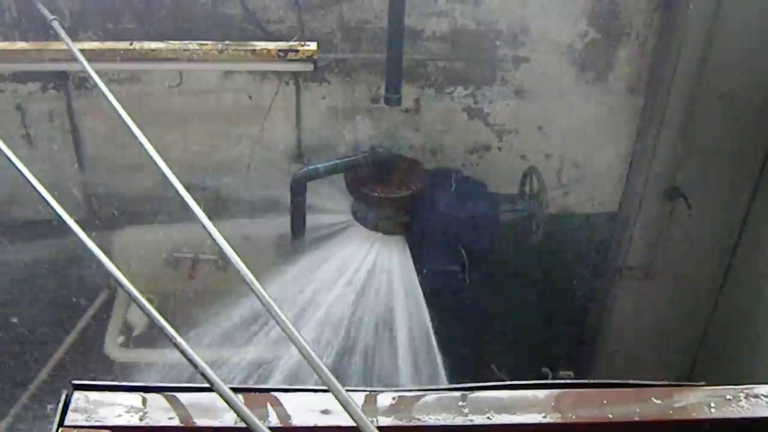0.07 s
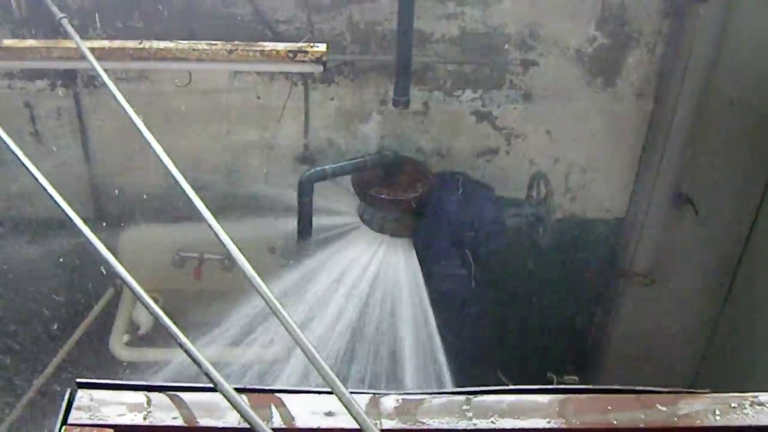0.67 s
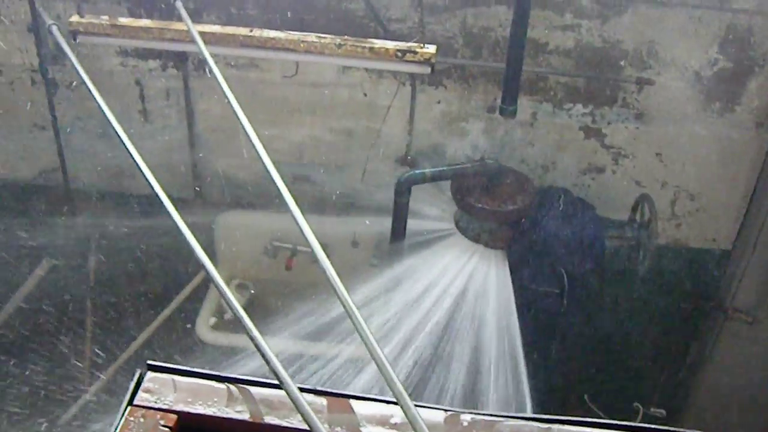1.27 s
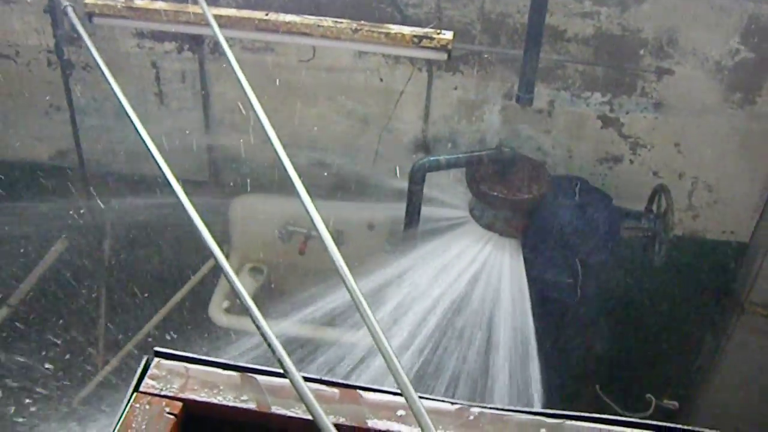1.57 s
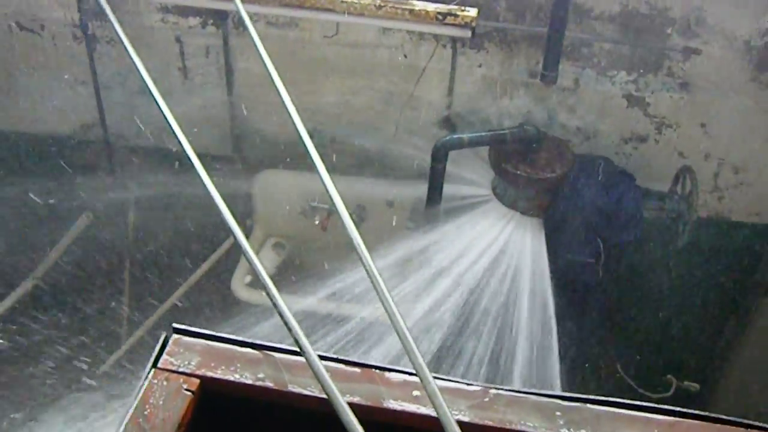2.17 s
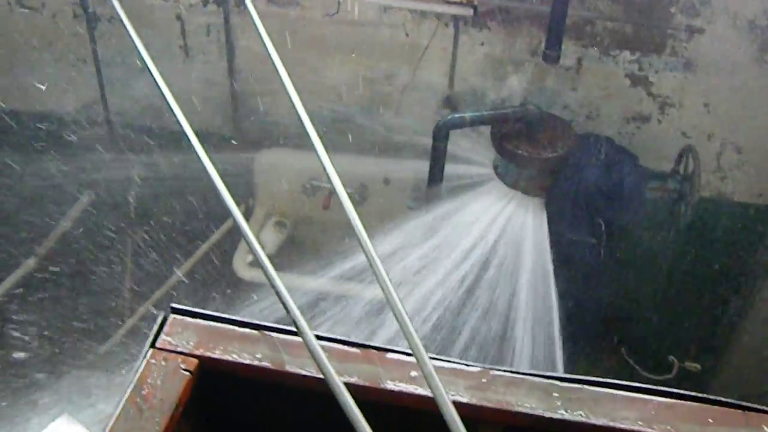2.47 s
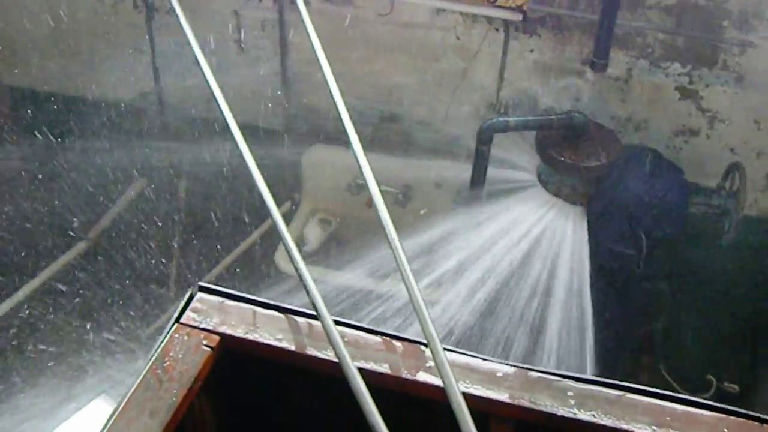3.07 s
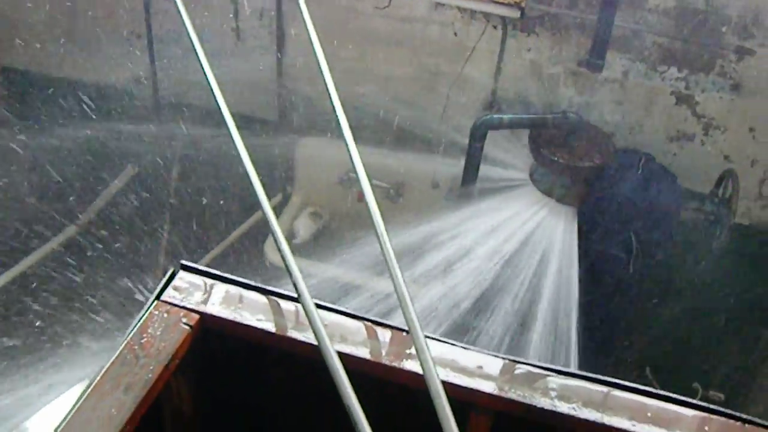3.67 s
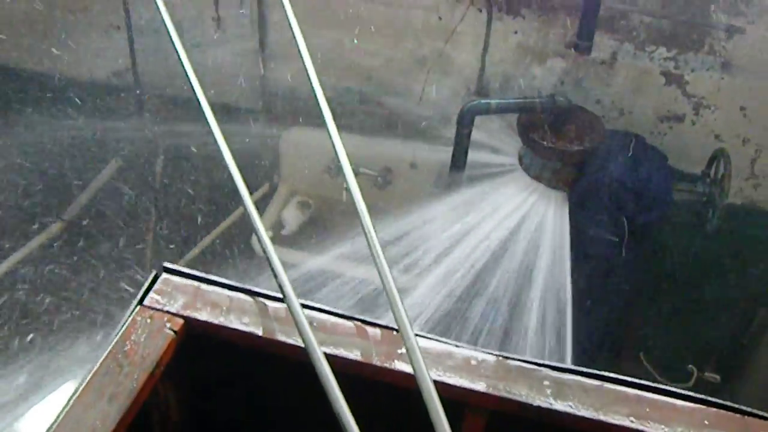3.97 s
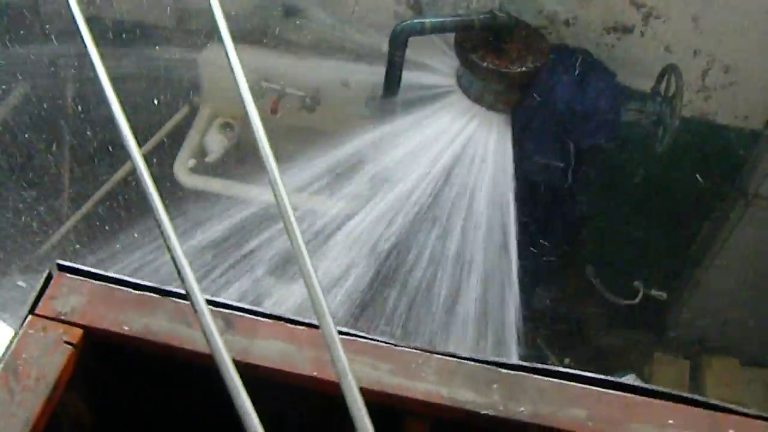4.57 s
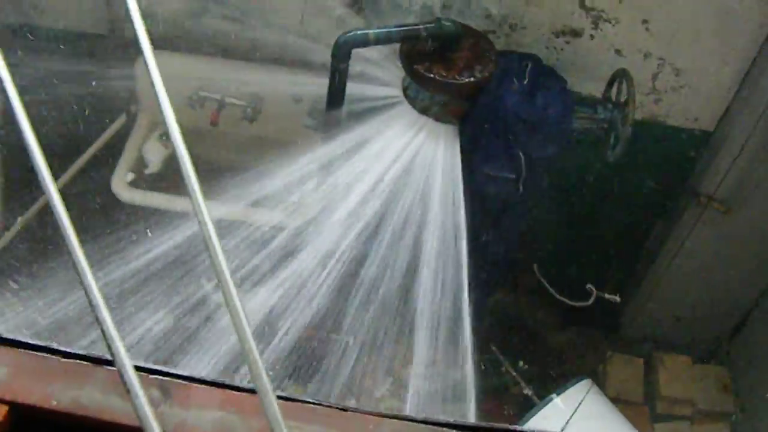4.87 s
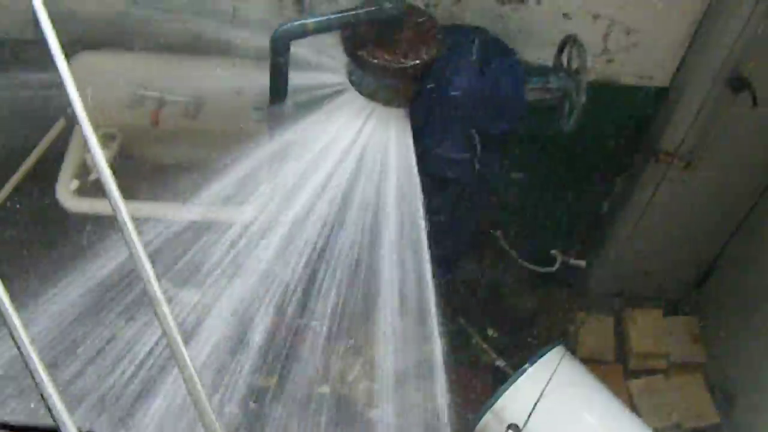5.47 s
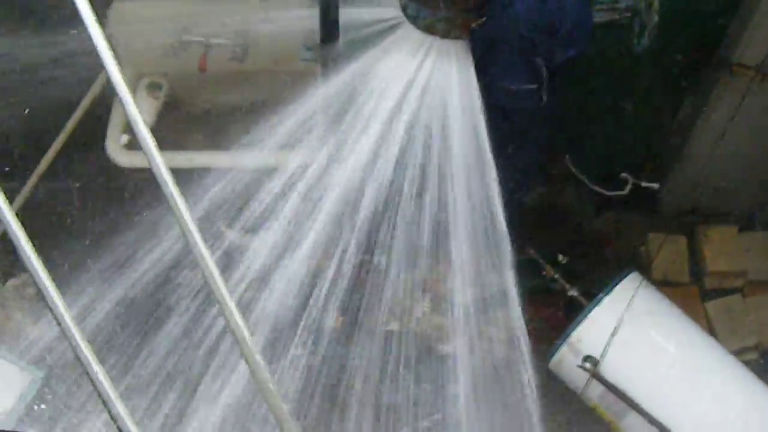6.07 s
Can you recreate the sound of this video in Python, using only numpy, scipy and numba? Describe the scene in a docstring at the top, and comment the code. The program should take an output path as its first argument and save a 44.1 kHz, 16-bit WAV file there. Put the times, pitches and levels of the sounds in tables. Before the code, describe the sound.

Pressurized water sprays from a split pipe fitting in a bare utility room, picked up by a handheld microphone a few metres away. A bright hiss cuts in abruptly just after the start and holds steady to the end. Beneath it, drops patter densely on the walls and floor, and the falling water makes a low, echoing wash. Two faint hollow splashes barely rise out of the spray in the first half.

```python
"""A bright, steady hiss cuts in as a handheld microphone is switched on, a few metres from pressurised
water fanning out of a split pipe flange in a bare utility room. The sheet hisses as it tears into drops.
The drops patter on walls and floor; the bulk of the water lands with a low wash that rings the room.
Twice a thicker gout lands with a faint hollow splash."""
import sys
import numpy as np
from scipy import signal
from scipy.fft import rfft, irfft
from scipy.io import wavfile
from numba import njit

SR = 44100
rng = np.random.default_rng(int(sys.argv[2]) if len(sys.argv) > 2 else 0)


def generate_wav(signal):
    """Clip the signal to [-1, 1] and save it as 16-bit WAV at the path in sys.argv[1]."""
    frames = np.transpose(np.atleast_2d(signal))
    scaled = np.clip(frames, -1, 1) * 32767
    pcm = np.round(scaled).astype(np.int16)
    wavfile.write(sys.argv[1], SR, pcm)


N = 278271
TIME_S = np.arange(N) / SR
FREQ_HZ = np.maximum(np.arange(N // 2 + 1) * SR / N, 1)
MIC_ON_S, TOP_HZ = 0.296, 15600


def undb(db):
    """Decibels to gain."""
    return 10 ** (np.asarray(db) / 20)


def unit(x):
    """Scale to rms 1."""
    return x / np.std(x)


def filtered(x, response):
    """Apply a frequency response."""
    return irfft(rfft(x) * response, N)


def colour(points):
    """Response through (freq_hz, gain_db) points on a log-frequency axis."""
    freq_hz, gain_db = np.transpose(points)
    return undb(np.interp(np.log(FREQ_HZ), np.log(freq_hz), gain_db))


def resonance(centre_hz, width_hz):
    """Response of one mode, gain 1 at its centre."""
    return 1 / (1 + 1j * (FREQ_HZ ** 2 - centre_hz ** 2) / (FREQ_HZ * width_hz))


def bump(at_s, sigma_s):
    """Gaussian swell from 0 to 1 and back."""
    return np.exp(-0.5 * ((TIME_S - at_s) / sigma_s) ** 2)


def walk(rate_hz):
    """Random drift, rms 1, mostly slower than rate_hz."""
    return unit(filtered(rng.standard_normal(N), 1 / (1 + (FREQ_HZ / rate_hz) ** 2)))


def impacts(rate_per_s, spread_db):
    """Random impulses: many small, a few large."""
    hit = rng.random(N) < rate_per_s / SR
    size = undb(spread_db * np.minimum(rng.exponential(size=N), 2 * np.pi))
    return unit(hit * size * rng.choice([-1, 1], N))


def churn(x, depth_db, rate_hz, band_count):
    """Overlapping bands swell and sink independently."""
    band_position = np.sqrt(np.minimum(FREQ_HZ / TOP_HZ, 1)) * (band_count - 1)
    spectrum = rfft(x)
    weights = (np.maximum(1 - abs(band_position - k), 0) for k in range(band_count))
    bands = (irfft(spectrum * weight, N) for weight in weights)
    return unit(sum(band * undb(depth_db * walk(rate_hz)) for band in bands))


def room(x, t60_s, wet_db):
    """Direct sound plus wall echo; each drop lands elsewhere, so each has its own diffuse tail."""
    energy_decay = undb(-60 * TIME_S[:SR] / t60_s) ** 2
    energy = np.maximum(signal.fftconvolve(x ** 2, energy_decay)[:N], 0)
    echo = np.sqrt(energy) * rng.standard_normal(N)
    return unit(x + undb(wet_db) * unit(echo))


def jet():
    """Turbulence at the crack and fizz of the flapping sheet bursting into mist."""
    # spectrum of the tearing sheet: freq_hz, gain_db
    hiss_spectrum = [(1200, -43), (3000, -9.5), (4500, -4), (6500, 1), (7300, 0), (8400, 1.5), (9700, 1.5),
                     (11300, -2.5), (13700, -0.7), (14700, 1.5), (15200, 0), (15700, -14.5)]
    fizz = undb(-6) * impacts(rate_per_s=5000, spread_db=2)
    turbulence = rng.standard_normal(N)
    source = churn(turbulence + fizz, depth_db=0.64, rate_hz=14, band_count=14)
    hiss = unit(filtered(source, colour(hiss_spectrum)))
    split_hz, tilt_gain = 7700, undb(0.18)
    lower = filtered(hiss, 1 / (1 + (FREQ_HZ / split_hz) ** 8))
    upper = hiss - lower
    swell = undb(0.5 * bump(at_s=4.96, sigma_s=0.062))
    hiss = lower / tilt_gain * swell * lull() + upper * tilt_gain
    flutter_db = 0.25 * walk(rate_hz=59)
    return hiss * undb(0.96 + flutter_db)


def patter():
    """Drops hit the walls and railing, each a tiny tick."""
    # spectrum of drops on hard wet surfaces: freq_hz, gain_db
    drop_spectrum = [(300, -47), (900, -3.5), (1600, -1.5), (3000, 0.5), (6000, 0), (15000, -7)]
    ticks = room(impacts(rate_per_s=3500, spread_db=2.5), t60_s=0.49, wet_db=0.5)
    ticks = churn(ticks, depth_db=0.36, rate_hz=22, band_count=12)
    return unit(filtered(ticks, colour(drop_spectrum))) * undb(-6.5)


def wash():
    """Heavy slaps on the flooded floor, blurred by the room and its standing waves."""
    # spectrum of water pounding the floor: freq_hz, gain_db
    slap_spectrum = [(25, -52), (60, -51), (95, -34), (130, -23.5), (200, -9.5), (330, -3.5), (520, 0.5),
                     (800, -1), (1200, -5), (2000, -9), (5000, -22.5)]
    # standing waves: centre_hz, width_hz, gain_db
    room_modes = [(140, 8.5, 1), (202, 19, -7), (303.6, 7.1, -5), (472, 20, -12)]
    slaps = room(impacts(rate_per_s=1800, spread_db=2), t60_s=0.95, wet_db=1.5)
    slaps = churn(slaps, depth_db=0.34, rate_hz=6.7, band_count=20)
    standing = 1 + sum(undb(db) * resonance(hz, width_hz) for hz, width_hz, db in room_modes)
    body = filtered(slaps, colour(slap_spectrum) * standing)
    # the wash thins as the microphone leans out over the railing
    lean_mid_s, lean_length_s, lean_db = 4.8, 0.3, -0.86
    lean = np.clip((TIME_S - lean_mid_s) / lean_length_s + 0.5, 0, 1)
    return unit(body) * undb(-14 + lean_db * lean)


def gushes():
    """Thicker gouts plunge into pooled water and swell with a hollow note."""
    # gouts landing: peak_s, sigma_s, level_db
    gouts = [(0.958, .06, -37.5), (2.963, .055, -36.5)]
    swell = sum(undb(level_db) * bump(peak_s, sigma_s) for peak_s, sigma_s, level_db in gouts)
    hollow = resonance(centre_hz=520, width_hz=210) ** 2
    splash = filtered(impacts(rate_per_s=2200, spread_db=1.5), hollow)
    return swell * unit(splash)


def lull():
    """Gain of a brief dip in the lower hiss, patter and wash."""
    return undb(-1.4 * bump(at_s=5.17, sigma_s=0.1))


def scene():
    """Hiss and landing water follow one strength, gushes on top; both channels alike."""
    # spray strength: time_s, level_db
    strength = [(0.36, -19), (1.88, -20), (6.02, -19.5), (6.1, -19.5)]
    time_s, level_db = np.transpose(strength)
    spray_gain = undb(np.interp(TIME_S, time_s, level_db))
    hiss = jet()
    landing = (patter() + wash()) * lull()
    surge = undb(0.32 * walk(rate_hz=3.4))  # water lands unevenly
    water = (hiss + landing * surge) * spray_gain + gushes()
    return np.array([water, water])


@njit
def moving_band(x, centre_hz, width_hz):
    """State-variable band-pass with a moving centre, peak gain 1."""
    y = np.empty(len(x))
    band_state, low_state = 0., 0.
    for i in range(len(x)):
        g = np.tan(np.pi * centre_hz[i] / SR)
        damping = width_hz / centre_hz[i]
        band = (band_state + g * (x[i] - low_state)) / (1 + g * (g + damping))
        band_state = 2 * band - band_state
        low_state += 2 * g * band
        y[i] = damping * band
    return y


def record(dry):
    """Narrow notches sit in the treble; the microphone switches on abruptly and the top is cut."""
    # narrow notches in the treble: centre_hz, width_hz
    notches = [(7860, 530), (9010, 160), (10005, 50)]
    # a broad dip slides down as the microphone swings off its first aim and settles
    swing_tau_s, dip_width_hz, dip_depth = 2.0, 850., 0.7
    swing = np.exp(-np.maximum(TIME_S - MIC_ON_S, 0) / swing_tau_s)
    dip_hz = 7364 + 350 * swing
    sound = np.array([x - dip_depth * moving_band(x, dip_hz, dip_width_hz) for x in dry])
    for centre_hz, width_hz in notches:
        sound = filtered(sound, 1 - resonance(centre_hz, width_hz))
    top_cut = signal.ellip(10, 0.2, 80, TOP_HZ, fs=SR, output="sos")
    return signal.sosfilt(top_cut, sound * (TIME_S >= MIC_ON_S))


dry = scene()
out = record(dry)
generate_wav(out)
```